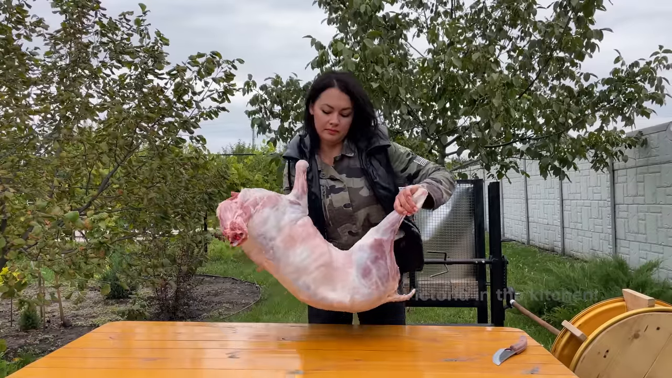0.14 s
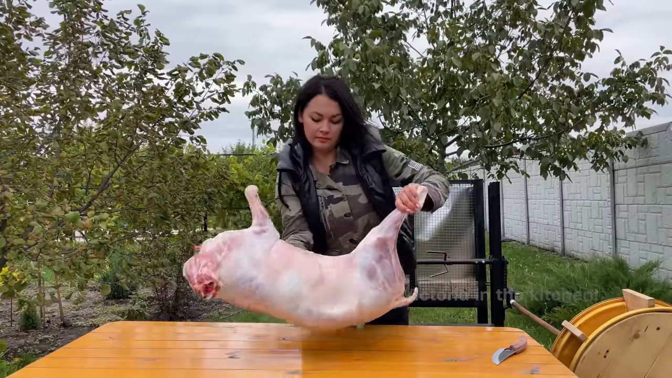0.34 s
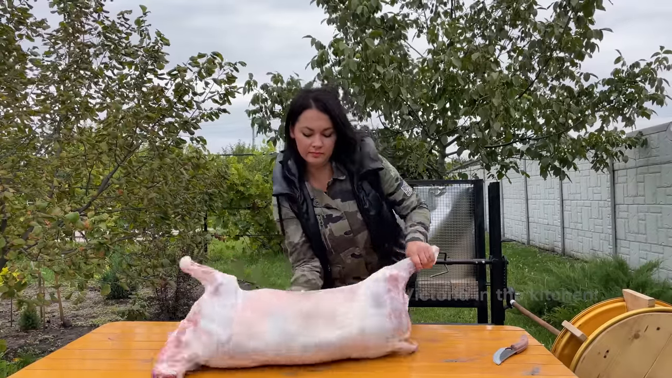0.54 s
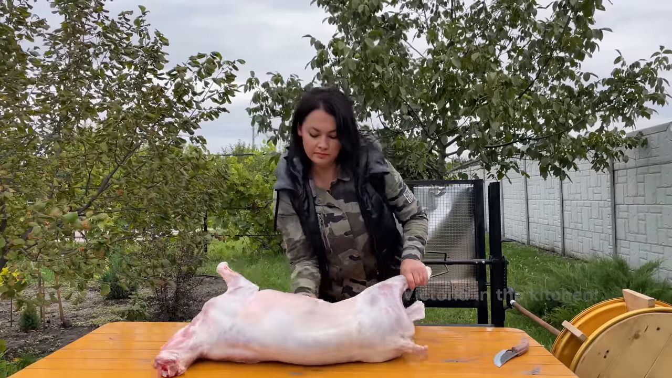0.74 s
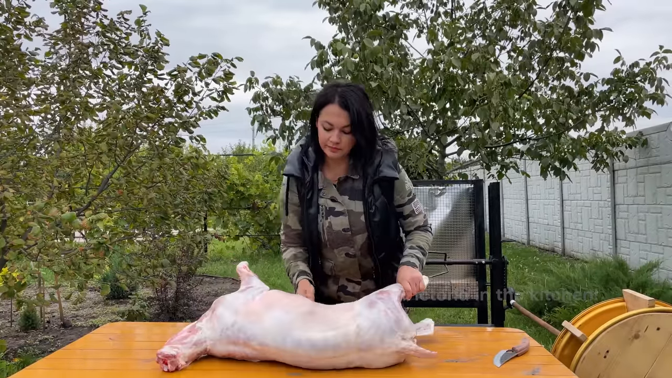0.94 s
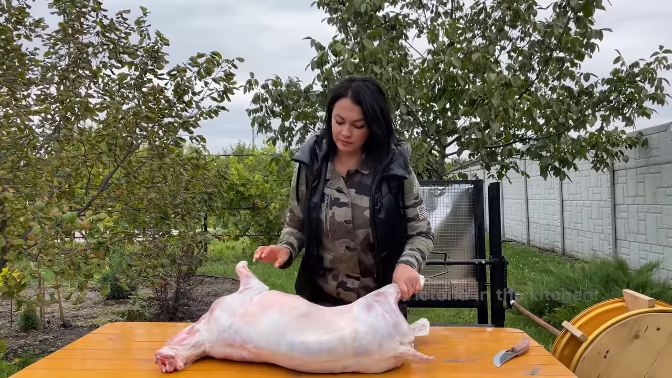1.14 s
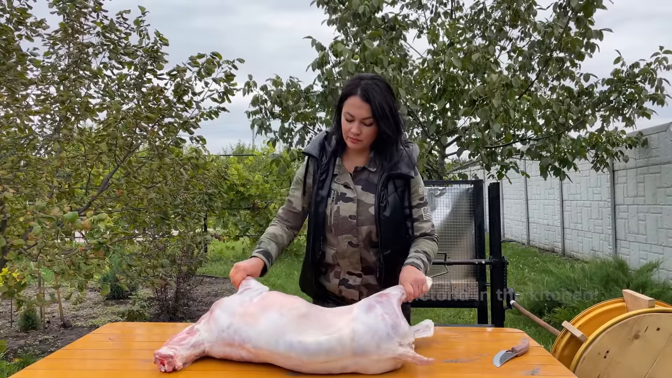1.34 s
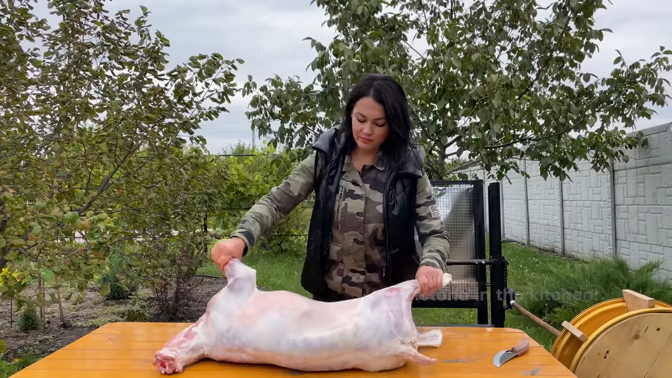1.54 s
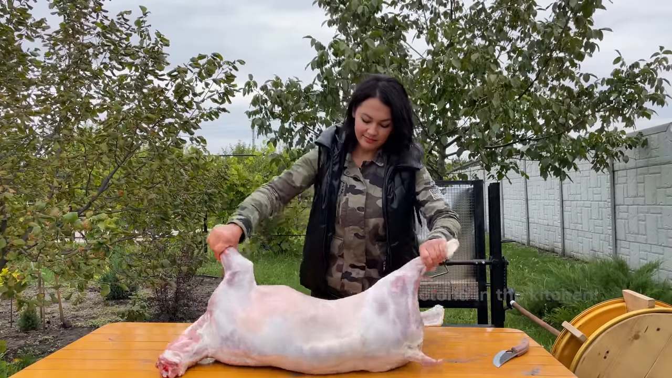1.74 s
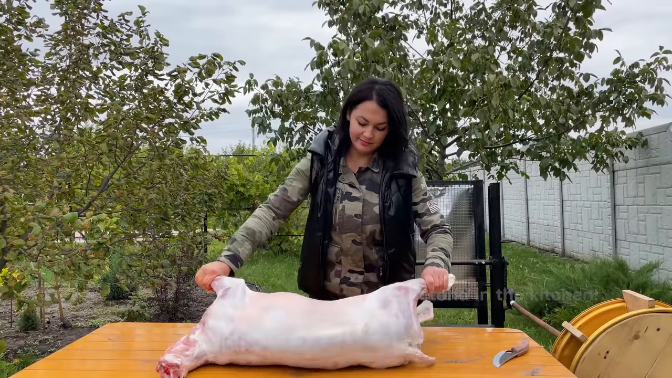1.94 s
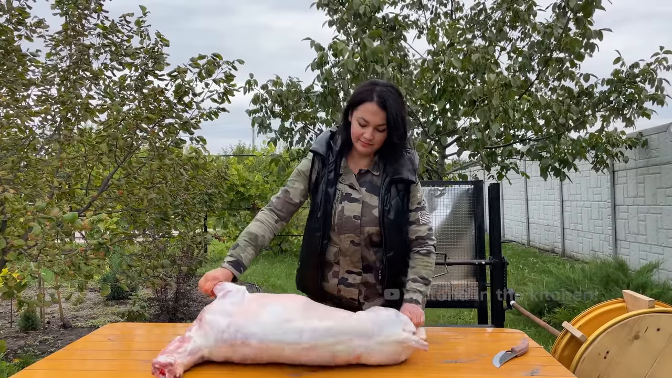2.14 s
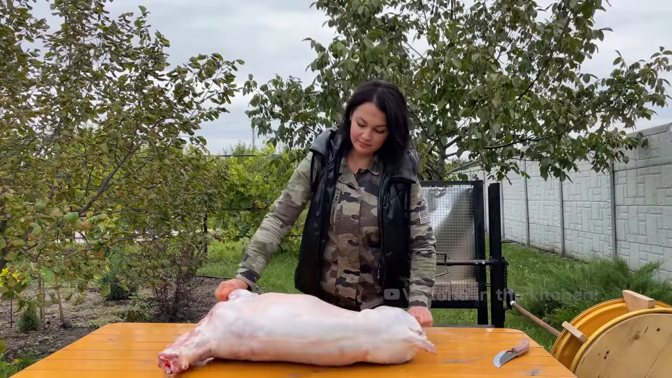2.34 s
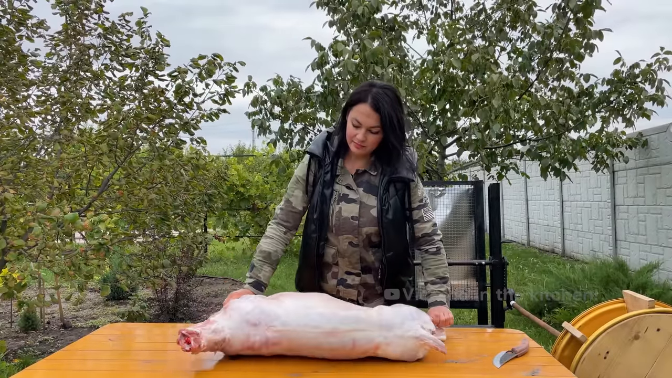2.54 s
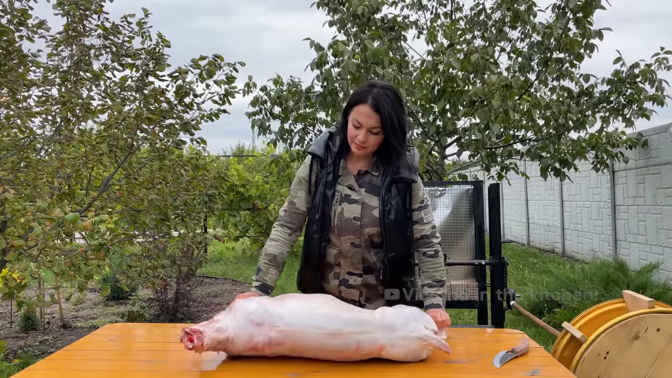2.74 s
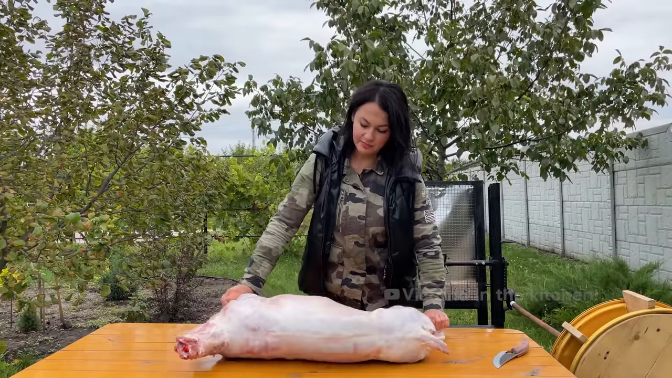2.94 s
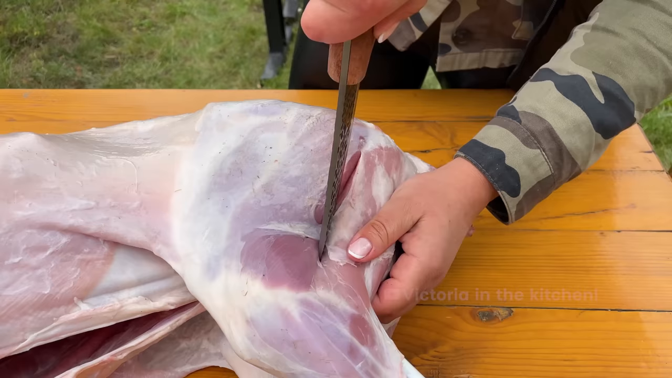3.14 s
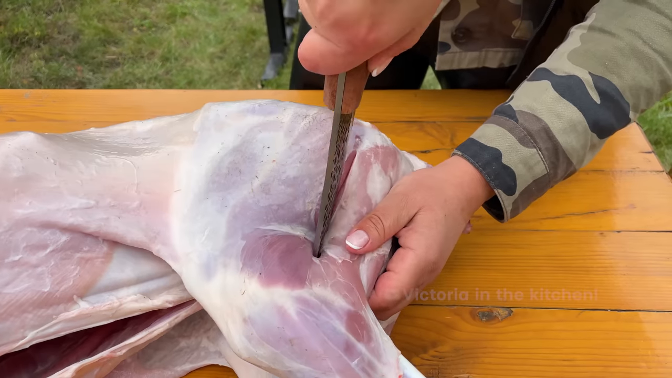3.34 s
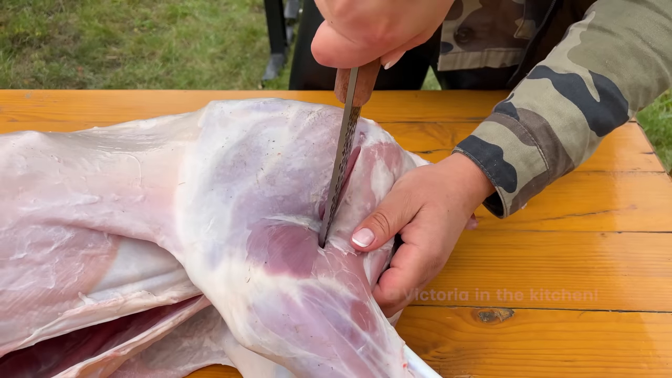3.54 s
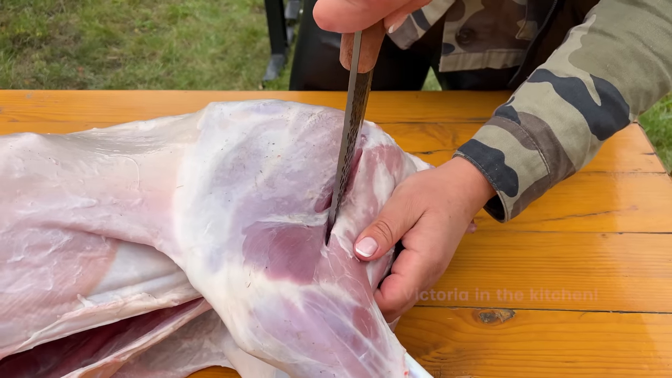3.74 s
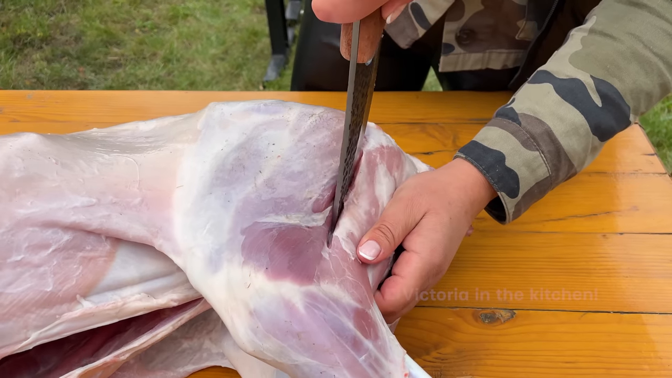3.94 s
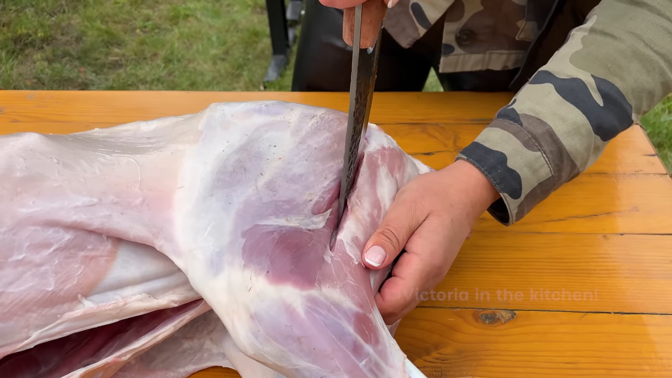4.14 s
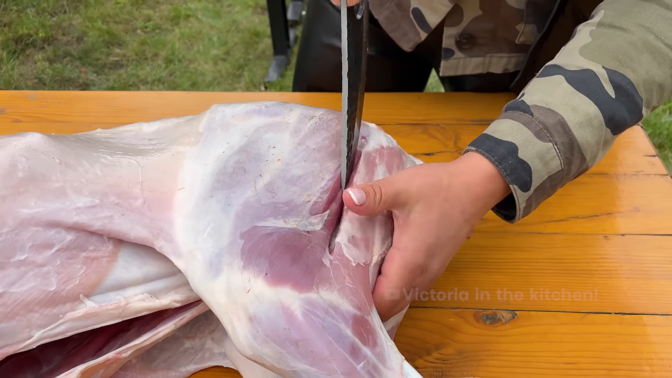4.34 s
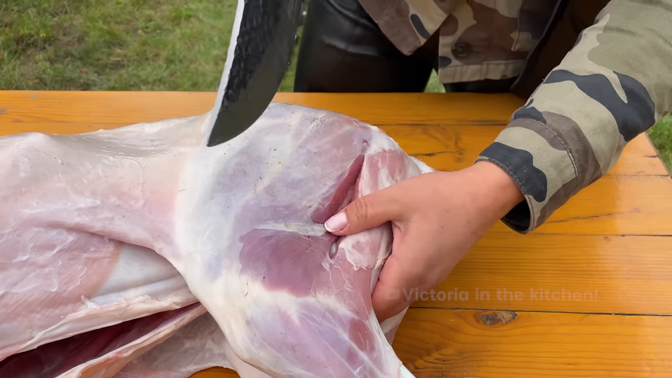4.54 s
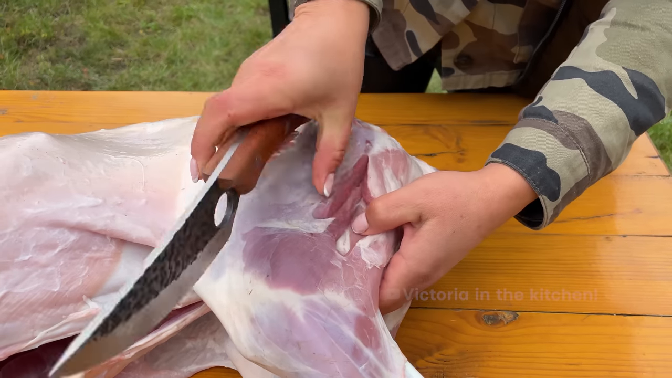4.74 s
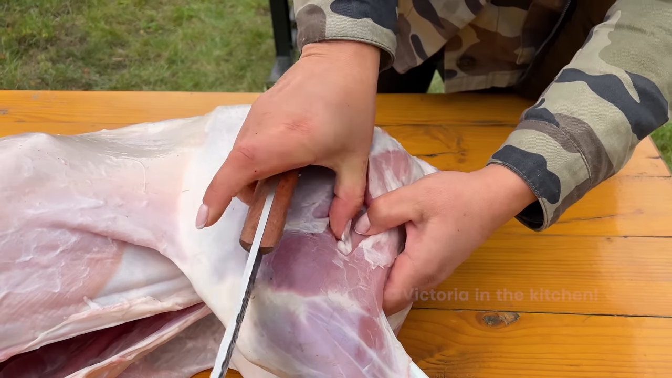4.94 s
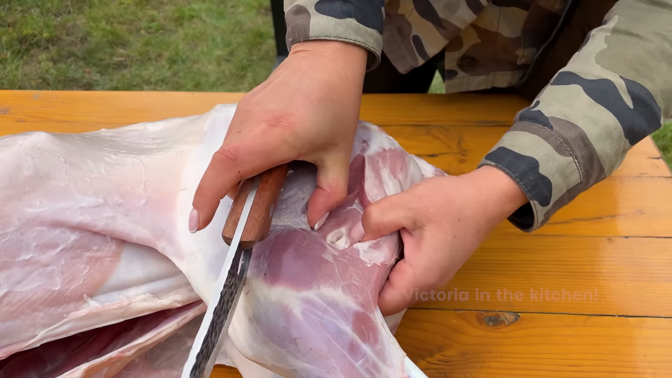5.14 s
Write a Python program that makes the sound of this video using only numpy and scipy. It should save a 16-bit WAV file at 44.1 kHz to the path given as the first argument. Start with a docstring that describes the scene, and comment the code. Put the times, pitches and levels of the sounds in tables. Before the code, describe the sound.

Close outdoor sound: hands rub moist skin, then a raw carcass slams on thick boards, sharp wet crack first, woody thump just after, smaller knocks and thin metallic rattling following. A far rooster call runs behind it. Later come soft rubbing, a double bone knock with another buzz, and quiet, irregular wet clicks and tearing crackles of a knife in flesh. Faint leaf hiss and low rumble continue throughout.

```python
"""Outdoors: leaves hiss over a low rumble (coloured noise), a far bark dies away (resonated noise) and hands rub
over a carcass (hiss and ticks); a distant rooster crows (gliding harmonics). The heavy raw carcass drops on a
wooden table (damped modes, wet snaps, swarms of pops), whose shaking sets loose metal buzzing (resonated bursts).
A faint far hum sinks (gliding sine). The carcass is rolled over until a leg bone knocks on the top and the
metal buzzes again. A knife then cuts the meat in wet snaps and crackling strokes."""
import sys
import numpy as np
from scipy import signal
from scipy.fft import rfft, irfft
from scipy.io import wavfile

SR = 44100
rng = np.random.default_rng(int(sys.argv[2]) if len(sys.argv) > 2 else 0)


def to_wav(sig):
    """Store sig (one row per channel, or 1-D mono) as 16-bit WAV at the path in sys.argv[1].

    Samples outside -1..1 are clipped; the rate is SR.
    """
    pcm = np.clip(np.atleast_2d(sig), -1, 1) * 32767
    pcm = np.round(pcm).astype(np.int16)
    wavfile.write(sys.argv[1], SR, pcm.T)  # frames by channels


N = 233244
TIME_S = np.arange(N) / SR

# leaves and far rumble: hz, relative_db_per_hz
AIR_SPECTRUM = [(12, -35), (20, -7), (74, 0), (198, -3.5), (255, -3), (319, -7), (459, -4), (590, -7),
                (738, -9.5), (802, -6.5), (923, -12), (2910, -11.5), (3440, -15), (4300, -13),
                (16000, -28.5)]
# echo of a far bark in the gardens: hz, nominal_width_hz, start_relative_db, t60_s
BARK_BANDS = [(144, 14, -24, 0.94), (298, 180, -14.5, 0.56), (630, 95, -4.5, 0.54), (625, 26, -3, 0.62),
              (830, 280, 3.5, 0.15), (884, 17.4, -2, 0.65), (1167, 68, -8, 0.5), (1393, 38, -17.5, 1),
              (1710, 230, -10.5, 0.49), (1784, 23, -14.5, 0.88), (2070, 260, -20, 0.52)]
# cloth hiss: hz, relative_db_per_hz
CLOTH_SPECTRUM = [(100, -12), (350, -2.5), (1000, 0), (2200, -4.5), (4000, -3.5), (7000, -8),
                  (10000, -18.5), (16000, -21.5)]
# sleeves and hands sliding over the carcass: middle_s, length_s (between 1/e power points), level_db
RUBS = [(-0.015, 0.068, -59.5), (0.262, 0.24, -68.5), (0.897, 0.5, -64.5), (2.6, 0.38, -68.5),
        (3.734, 1, -68.5), (4.49, 0.23, -69), (4.795, 0.17, -61.5), (5.037, 0.52, -69)]
# distant rooster: start_s, length_s, pitch_hz (before scoop and sag), level_db (before swell)
CROW = (0.24, 1.03, 759.5, -66)
# wet snaps of skin and sinew, and the hard click of the leg bone knocking at 2.166 s: start_s, level_db,
# pitch_hz, decay_ms
SNAPS = [(0.570, -38, 4600, 4.9), (0.5915, 1, 3730, 0.45), (0.5917, -6.5, 6940, 0.21),
         (0.599, -16, 5800, 0.31), (0.6083, -6, 4840, 0.27), (0.759, -30.5, 6830, 0.55),
         (0.7936, -21, 4500, 0.35), (0.9518, -30.5, 5130, 0.33), (1.781, -39, 2850, 1),
         (1.868, -44.5, 4260, 0.8), (2.0438, -40.5, 7400, 0.38), (2.071, -37, 2900, 1.5),
         (2.0831, -32.5, 7100, 0.44), (2.1659, -25, 3600, 0.9), (2.475, -31, 2840, 0.48),
         (2.546, -25.5, 3800, 0.18), (2.581, -40, 6600, .5), (3.260, -33.5, 5950, 0.4),
         (3.424, -21.5, 5950, 1), (3.4244, -23, 4150, 1.6), (3.4493, -27, 4900, 0.88),
         (3.4628, -30.5, 5500, 1.2), (3.6735, -26, 4700, 0.65), (3.690, -25.5, 2880, 2.2),
         (3.6906, -21.5, 5150, 0.43), (3.697, -31, 3240, 0.8), (3.708, -27.5, 6060, 0.85),
         (3.711, -30, 5350, 1.7), (3.716, -31, 5900, 0.75), (3.7304, -29.5, 2430, 1.53),
         (3.808, -32.5, 2880, 0.91), (4.040, -37.5, 3500, 1.05), (4.2369, -42.5, 3780, .8),
         (4.431, -35.5, 3620, 0.52), (5.0046, -26, 4000, 0.28), (5.148, -37, 4250, 0.32)]
# blows on the table top: start_s, force_db, hardness_hz (force spectrum corner),
# damping_db_per_s (flesh lying on the wood, sign ignored)
BLOWS = [(0.578, -35, 302, 100), (0.5917, -25.5, 1850, 150), (0.5986, -22.5, 780, 130),
         (0.6074, -24, 700, 121), (0.6331, -13.5, 380, 176.5), (0.638, -30.5, 790, -1),
         (0.762, -43, 1370, 211), (0.796, -23.5, 330, 216), (0.812, -28.5, 288, 156),
         (0.868, -45.5, 444, 83), (0.972, -46, 750, 95), (0.985, -43.5, 251, 2.5), (1.661, -55, 695, 95),
         (1.766, -60, 1600, 401), (2.053, -30.5, 265, 352), (2.074, -46.5, 790, 190),
         (2.1648, -30, 3700, 54), (2.456, -50.5, 300, 96), (3.397, -56.5, 1200, 397.5),
         (4.746, -55, 600, 207), (4.812, -62.5, 1223, 203)]
# table modes: hz, level_db, t60_s (before damping by flesh)
TABLE_MODES = [(136.7, -11, 0.18), (141, -10.5, 0.055), (206, -7, 0.034), (227, 1, 0.036),
               (252.2, -6.5, 0.11), (255, -31, 3.8), (352, -10, 0.078), (503.4, -6.5, 0.17),
               (532, -5, 0.084), (609, -7, 0.084), (706, -8.5, 0.066), (750, -10, 0.1), (820, -18.5, 0.25),
               (975, -2.5, 0.019), (1016, -7, 0.072), (1220, -5, 0.027), (1470, 1.5, 0.023),
               (1677, -1.5, 0.025), (2380, 5, 0.011)]
# the whole top giving way: hz, level_db, t60_s (before damping by flesh)
THUMP_MODE = (219.5, 0.56, 0.045)
# note of one long plank: hz, level_db (at PLANK_HARDNESS_HZ), t60_s (before damping by flesh)
PLANK_MODE = (323, -8, 0.48)
# dense short ringing of the boards: hz, relative_db_per_hz
BOARDS_SPECTRUM = [(50, -33), (120, 3.5), (280, 5), (420, -1), (560, 7.5), (1400, 2.5), (2600, 2.5),
                   (4200, 0), (6500, -49.5), (15000, -42)]
# its decay: hz, t60_s (before damping by flesh)
BOARDS_DECAY = [(100, 0.41), (600, 0.15), (1500, 0.18), (3000, 0.053), (8000, 0.085)]
# squelches and blade strokes: start_s, length_s, level_db, centre_hz
STROKES = [(0.581, 0.049, -36.5, 5230), (0.601, 0.074, -47, 5300), (0.625, 0.1, -55, 5550),
           (2.056, 0.095, -60.5, 6700), (2.44, 0.076, -65.5, 7140), (3.279, 0.062, -66, 6600),
           (3.392, 0.032, -60, 6760), (3.423, 0.073, -53, 5000), (3.575, 0.032, -60, 4340),
           (3.669, 0.061, -53, 4470), (3.793, 0.048, -61.5, 4560), (3.925, 0.055, -56, 3240),
           (4.115, 0.057, -63.5, 6250), (4.404, 0.064, -65.5, 3970)]
# spells of buzzing metal: start_s, hold_s (attack included), level_db
BUZZES = [(0.675, 0.043, -56.5), (0.8, 0.0086, -61), (0.899, 0.031, -59), (0.99, 0.049, -62.5),
          (1.124, 0.026, -55), (1.37, 0.02, -75), (2.191, 0.057, -51.5)]
# ringing of the loose metal: hz, nominal_width_hz, relative_db
METAL_MODES = [(2830, 30, -9), (3280, 30, -14), (3990, 50, -12), (4280, 100, -8), (4940, 50, -3),
               (5150, 140, 0), (5520, 100, -1), (5930, 140, -5), (7010, 90, -5), (7330, 50, -14),
               (8480, 110, -7), (8740, 50, -13), (9930, 130, -6), (10800, 80, -18), (11450, 300, -14)]
# faint far hum: start_s, length_s, pitch_hz (at its start), level_db
HUM = (1.5, 0.5, 492, -75)

AIR_DB = -69
HOLDING_DB = -75.5  # hands that only hold the carcass
CROW_SCOOP, CROW_SCOOP_S = 0.11, 0.045  # starts flat by this share of the pitch, slides up
CROW_SAG, CROW_SAG_POWER = 0.11, 2.8  # sinks by this share, mostly near the end
CROW_RISE_S, CROW_FADE_S, CROW_SWELL_DB_PER_S = 0.06, 0.24, 5
# a blow harder than this lands on a smaller spot and singles the plank out
PLANK_HARDNESS_HZ, PLANK_DB_PER_OCTAVE = 800, 1.5
BUZZ_ATTACK_S, BUZZ_RELEASE_DB_PER_S = 0.009, 285
HUM_SAG_HZ_PER_S, HUM_RISE_S, HUM_FADE_S = 70, 0.076, 0.11
EDGE_HZ = 16200


def amp(db):
    """Decibels to gain."""
    return 10 ** (np.asarray(db) / 20)


def unit(x):
    """Scales to rms 1."""
    return x / np.sqrt(np.mean(x ** 2) + 1e-20)


def read(points, hz):
    """Reads a curve on a log-frequency axis."""
    point_hz, value = np.transpose(points)
    return np.interp(np.log(hz + 1), np.log(point_hz), value)


def add(mix, start_s, sound):
    """Mixes a sound in at start_s."""
    part = mix[max(round(start_s * SR), 0):][:len(sound)]
    part += sound[:len(part)]


def colour(x, points):
    """Gives x a spectrum, at rms 1."""
    gain = amp(read(points, np.fft.rfftfreq(len(x), 1 / SR)))
    return unit(irfft(rfft(x) * gain, len(x)))


def resonate(x, hz, width_hz):
    """A two-pole resonance of gain 1."""
    return signal.lfilter(*signal.iirpeak(hz, hz / width_hz, SR), x)


def muffle(x, hz):
    """Takes away what lies above hz."""
    return signal.sosfilt(signal.butter(2, hz, fs=SR, output="sos"), x)


def highpass(x, hz, order):
    """Takes away what lies below hz."""
    return signal.sosfilt(signal.butter(order, hz, "high", fs=SR, output="sos"), x)


def drift(corner_hz):
    """Slow random wavering of rms 1."""
    slope = 1 + (np.fft.rfftfreq(N, 1 / SR) / corner_hz) ** 4
    return unit(irfft(rfft(rng.standard_normal(N)) / slope, N))


def tail(points, t60s, size=16384):
    """Noise of a given colour in which each band dies at its own speed."""
    hz, t, bins = signal.stft(colour(rng.standard_normal(size), points), SR, nperseg=512)
    fade = amp(-60 * t / read(t60s, hz)[:, None])
    return signal.istft(bins * fade, SR, nperseg=512)[1][:size]


def held(start_s, length_s, rise_s, fade_s):
    """An envelope that rises, holds and fades."""
    rise = (TIME_S - start_s) / rise_s
    fade = (start_s + length_s - TIME_S) / fade_s
    return np.clip(np.minimum(rise, fade), 0, 1)


def far_note(hz, harmonics_db):
    """A long gliding note that wavers a little on its way through the air."""
    phase = 2 * np.pi * np.cumsum(hz * (1 + 0.004 * drift(40))) / SR
    level = amp(1.2 * drift(25))
    return level * sum(amp(db) * np.sin(k * phase) for k, db in enumerate(harmonics_db, 1))


def air():
    """Steady faint leaves and far rumble: coloured noise."""
    return amp(AIR_DB) * colour(rng.standard_normal(N), AIR_SPECTRUM)


def bark(level_db=-44, widening=2):
    """The harmonics of a far bark, smeared into noise bands by many echoes, die away."""
    out = np.zeros(N)
    for hz, width_hz, db, t60_s in BARK_BANDS:
        echoes = rng.standard_normal(N)
        for _ in range(2):
            echoes = resonate(echoes, hz, widening * width_hz)
        out += amp(db - 60 * TIME_S / t60_s) * unit(echoes)
    return amp(level_db) * out


def rubbing(flutter_db=1.5, ticks_per_s=60, ticks_db=-9, tick_hz=5500):
    """Cloth slides with a soft hiss while fingers stick and unstick on the moist skin; slides swell and fade."""
    hiss = colour(rng.standard_normal(N), CLOTH_SPECTRUM) * amp(flutter_db * drift(50))
    sticks = (rng.random(N) < ticks_per_s / SR) * rng.standard_normal(N)
    ticks = unit(muffle(resonate(sticks, tick_hz, 4200), 9500))
    power = np.full(N, amp(HOLDING_DB) ** 2)
    for middle_s, length_s, db in RUBS:
        power += amp(db) ** 2 * np.exp(-(2 * (TIME_S - middle_s) / length_s) ** 2)
    return np.sqrt(power) * (hiss + amp(ticks_db) * ticks)


def rooster(fundamental_db=-8, second_db=-2):
    """One long note that scoops up, holds and sags, carried mostly by its second harmonic."""
    start_s, length_s, hz, db = CROW
    t = np.clip(TIME_S - start_s, 0, length_s)
    scoop = CROW_SCOOP * np.exp(-t / CROW_SCOOP_S)
    sag = CROW_SAG * (t / length_s) ** CROW_SAG_POWER
    level = amp(db + CROW_SWELL_DB_PER_S * t) * held(start_s, length_s, CROW_RISE_S, CROW_FADE_S)
    return level * far_note(hz * (1 - scoop - sag), [fundamental_db, second_db])


def snaps(pocket=0.68, spray=0.4, after_db=-22, after_s=0.0035, low_cut=0.23, top_hz=13000, size=2048):
    """A film or fibre parts: a tiny pocket rings for a few cycles in a spray of smaller breaks."""
    t, out = np.arange(size) / SR, np.zeros(N)
    for start_s, db, hz, decay_ms in SNAPS:
        fade = np.exp(-1000 * t / decay_ms)
        ring = pocket * fade * np.cos(2 * np.pi * hz * t)
        breaks = unit(resonate(rng.standard_normal(size), hz, hz * .5))
        breaks *= spray * (fade + amp(after_db) * np.exp(-t / after_s))
        opening = 1 - np.exp(-2 * hz * t)  # the pocket opens within about a cycle
        snap = opening * (ring + breaks)
        add(out, start_s, amp(db) * highpass(snap, low_cut * hz, order=1))
    return muffle(out, top_hz)


def mode(t, hz, db, t60_s):
    """One decaying sine of the struck wood."""
    return amp(db - 60 * t / t60_s) * np.sin(2 * np.pi * hz * t)


def table(boards_db=-5, bass_hz=102, thinness=0.056, size=44100):
    """Each blow rings the top; soft flesh presses slowly and stirs the low modes, bone mostly the high ones."""
    t, out = np.arange(size) / SR, np.zeros(N)
    # neighbouring modes swing in opposite directions
    modes = sum((-1) ** k * mode(t, *row) for k, row in enumerate(TABLE_MODES))
    modes += mode(t, *THUMP_MODE)
    plank = -mode(t, *PLANK_MODE)
    for start_s, force_db, hardness_hz, damping_db_per_s in BLOWS:
        plank_db = PLANK_DB_PER_OCTAVE * np.log2(hardness_hz / PLANK_HARDNESS_HZ)
        ring = modes + plank * amp(plank_db)
        add(ring, 0, amp(boards_db) * tail(BOARDS_SPECTRUM, BOARDS_DECAY, size=8192))
        ring *= amp(-abs(damping_db_per_s) * t)
        knock = highpass(muffle(ring, hardness_hz), thinness * hardness_hz, order=2)
        add(out, start_s, amp(force_db) * knock)
    return highpass(out, bass_hz, order=3)  # open boards radiate little deep bass


def strokes(pops_per_s=3500, spread_db=4.0, octaves=0.91, cycles=1.43, pitches=16):
    """Wet tissue tears in a swarm of tiny pops of uneven size, spread over many pitches."""
    out, t = np.zeros(N), np.arange(256) / SR
    for start_s, length_s, db, centre_hz in STROKES:
        u = np.linspace(0, 1, int(length_s * SR))
        swarm = np.zeros(len(u))
        for place in np.linspace(-1, 1, pitches):
            hz = centre_hz * 2 ** (octaves * place)
            chance, sign, size = rng.random((3, SR // 4))[:, :len(u)]
            size_gain = amp(spread_db * np.minimum(-np.log(size), 3))
            pops = (chance < pops_per_s / pitches / SR) * np.sign(sign - .5) * size_gain
            # outer pitches are weaker
            pop = np.exp(-hz * t / cycles - place ** 2) * np.sin(2 * np.pi * hz * t)
            swarm += np.convolve(pops, pop)[:len(u)]
        swell = np.sin(np.pi * u) ** 2 / (np.sin(np.pi * u) + 0.27)
        add(out, start_s, amp(db) * unit(swarm * swell))
    return out


def buzz_level():
    """Each spell starts quickly, holds, and dies away as the table settles."""
    level = np.zeros(N)
    for start_s, hold_s, db in BUZZES:
        attack = np.clip((TIME_S - start_s) / BUZZ_ATTACK_S, 0, 1)
        release_s = np.maximum(TIME_S - start_s - hold_s, 0)
        level = np.maximum(level, attack * amp(db - BUZZ_RELEASE_DB_PER_S * release_s))
    return level


def buzz(chatter_hz=323, scatter_turns=0.64, clatter_db=-8, widening=1.6):
    """Loose metal chatters on the wood, a fading noise burst in each swing of the table, and rings."""
    turns = np.cumsum(chatter_hz * (1 + .04 * drift(60))) / SR
    taps = rng.standard_normal(N) * np.exp(-(turns % 1) / scatter_turns)
    ring = np.zeros(N)
    for hz, width_hz, db in METAL_MODES:
        once = resonate(taps, hz, widening * width_hz)
        ring += amp(db) * unit(resonate(once, hz, widening * width_hz))
    clatter = unit(muffle(resonate(taps, 4300, 3000), 8300))
    return buzz_level() * (unit(ring) + amp(clatter_db) * clatter)


def hum():
    """A faint far tone that sinks steadily."""
    start_s, length_s, hz, db = HUM
    pitch_hz = hz - HUM_SAG_HZ_PER_S * (TIME_S - start_s)
    return amp(db) * held(start_s, length_s, HUM_RISE_S, HUM_FADE_S) * far_note(pitch_hz, [0])


def garden(x, wet_db=-25.5, build_up_s=0.0051):
    """Wall, trees and ground return a weak scattered echo."""
    spectrum = [(80, -8), (300, 1.5), (1500, -1), (5000, -5.5), (15000, -18.0)]  # hz, relative_db_per_hz
    decay = [(200, 0.74), (1500, 0.54), (5000, 0.59), (12000, 0.31)]  # hz, t60_s
    echo = tail(spectrum, decay)
    echo *= 1 - np.exp(-np.arange(len(echo)) / SR / build_up_s)
    return x + amp(wet_db) * signal.fftconvolve(x, echo / np.linalg.norm(echo))[:N]


def scene():
    """Near sounds with their echo, and the far background."""
    near = table() + snaps() + strokes() + rubbing() + buzz()
    return (garden(near) + bark() + rooster() + hum() + air())[None]


def record(dry):
    """Limits the band to below EDGE_HZ with a linear-phase filter."""
    lowpass = signal.firwin(511, EDGE_HZ, window=("kaiser", 9), fs=SR)
    return signal.oaconvolve(dry, lowpass[None], "same")


dry = scene()
out = record(dry)
to_wav(out)
```